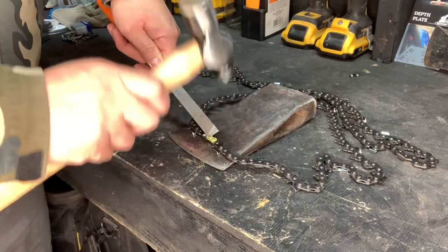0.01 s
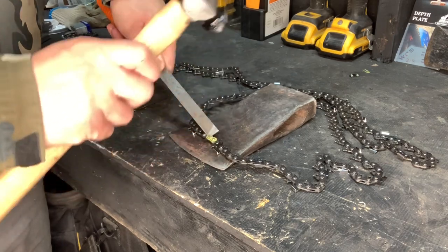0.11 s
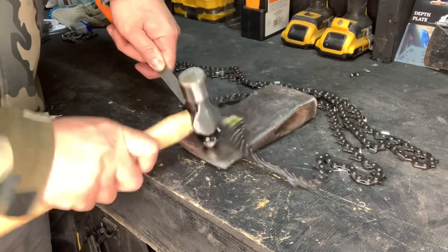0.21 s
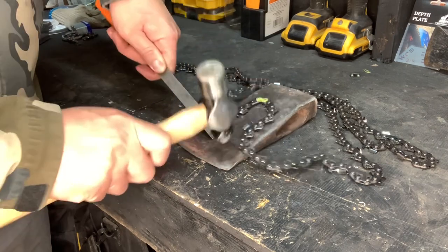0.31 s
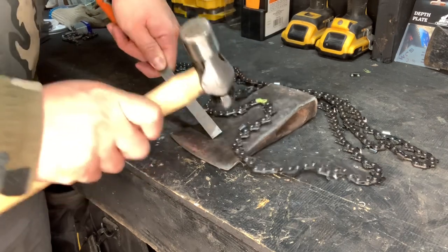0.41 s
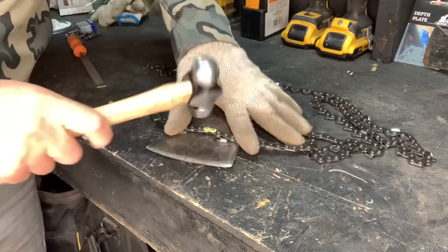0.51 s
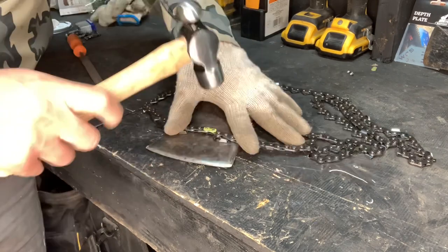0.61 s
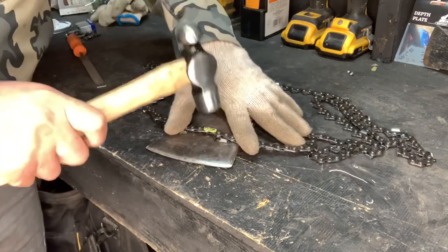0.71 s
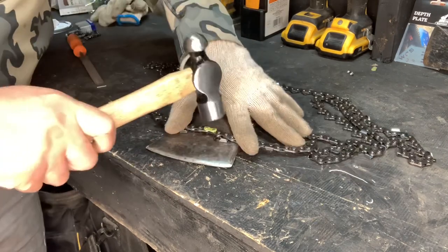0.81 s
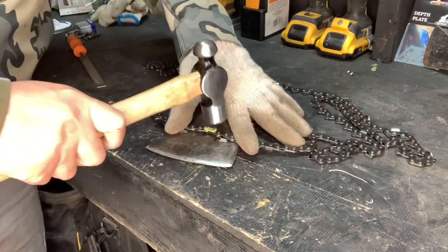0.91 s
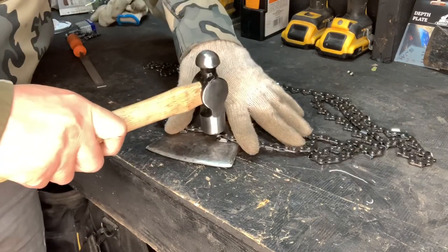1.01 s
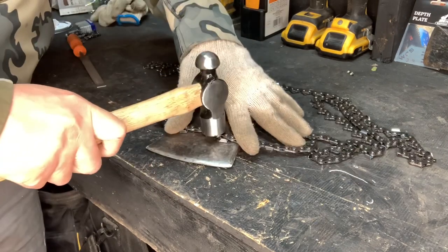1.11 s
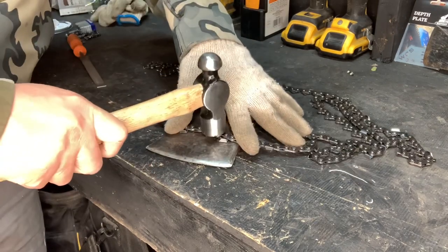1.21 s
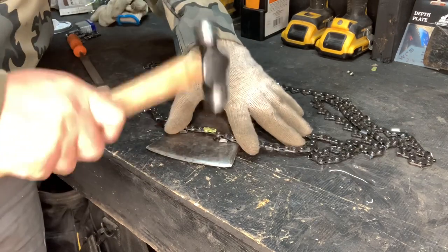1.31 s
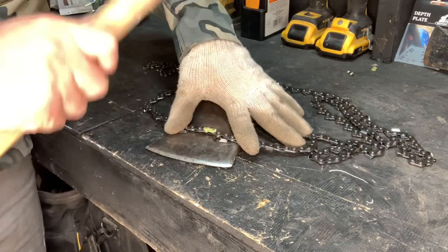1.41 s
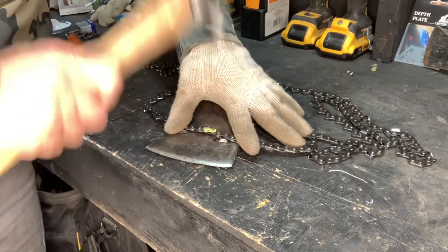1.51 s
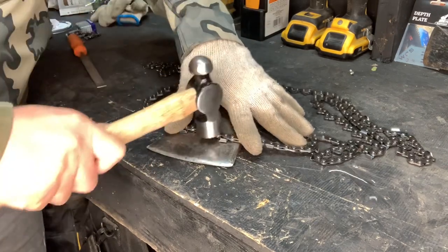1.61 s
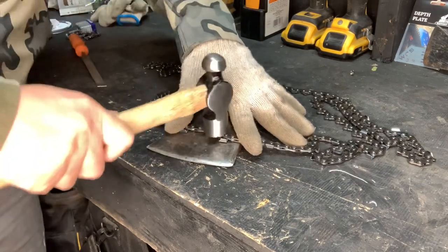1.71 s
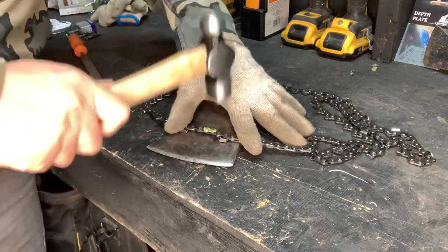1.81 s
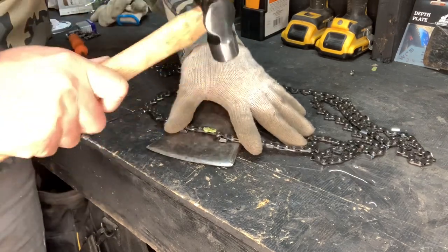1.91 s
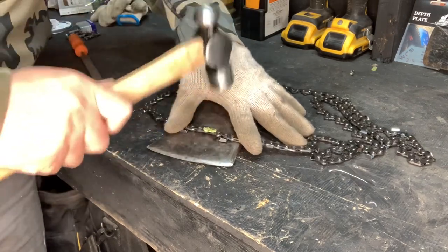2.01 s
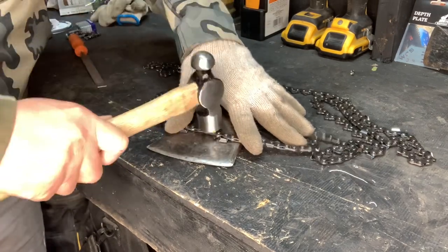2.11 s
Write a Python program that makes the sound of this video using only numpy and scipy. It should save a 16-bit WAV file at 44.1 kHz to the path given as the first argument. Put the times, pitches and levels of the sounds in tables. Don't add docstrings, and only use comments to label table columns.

```python
import sys
import numpy as np
from scipy import signal
from scipy.fft import rfft, irfft, next_fast_len
from scipy.io import wavfile

SR = 44100
rng = np.random.default_rng(int(sys.argv[2]) if len(sys.argv) > 2 else 0)


def gain_from_decibels(decibels):
    exponent = np.asarray(decibels, float) / 20
    return 10 ** exponent


def wav_out(sig):
    wavfile.write(sys.argv[1], SR, np.round(np.clip(np.atleast_2d(sig).T, -1, 1) * 32767).astype(np.int16))


N = 97020
T = np.arange(N) / SR
CHANGE_S = .549

BAR_S = [.2075, .2118, .2147, .2183, .2212, .2277, .2345, .246]
RIVET_S = [1.0058, 1.0075, 1.012, 1.5735, 1.5768, 1.5787, 1.5812, 1.592, 2.1334, 2.135, 2.141]
THUD_S = [.225, .255, .28, .315, 1.008, 1.021, 1.052, 1.101, 1.580, 1.590, 1.612, 1.645, 1.70, 1.77, 2.134,
          2.148, 2.170, 2.188]
LINK_S = [.2173, .2208, .2253, .236, .338, .4607]
CHAIN_S = [1.0035, 1.012, 1.5768, 1.582, 1.615, 2.1322, 2.141]
BLOW_S = [.2135, 1.0055, 1.5765, 2.1335]
LEAD_S = [.007, .004, .034, .009]
HOLD_S = [.014, .004, .006, .004]
BAR_HZ = [1640, 2002, 2222, 2430, 2542, 3382, 3461, 6600, 6880, 7265, 7575]
RING_HZ = [3266, 3312, 3345, 3440, 5019, 6512, 10990, 11680, 12280, 12530, 13130, 13785]
LINK_HZ = [10780, 11700, 12500, 13100, 14150]
BAR_T60 = [.04, .06, .08, .045, .04, .035, .04, .035, .04, .05, .06]
RING_T60 = [.18, .2, .36, .26, .42, .2, .3, .17, .16, .24, .12, .32]
AXE_T60 = [0.092, 0.033, 0.052, .04, 0.027, 0.039, 0.013, 0.026, 0.043, 0.045, .02, 0.0073, 0.016]
SING_DB = [-65, -65.5, -48.5]

BLOWS = list(zip(BLOW_S, LEAD_S, [-17.5, -47.0, -14.5, -31.0], [-6.5, -20, -7.5, -23.5],
         [-19.5, 12, -41.5, -1.5], HOLD_S))
# (frequency [Hz], level [dB])
BLOW_COLOURS = [
    [(50, 0), (130, -20), (300, -3), (800, -10.5), (2400, 1), (6500, -13), (9000, -14), (13000, -24.5),
     (15500, -45.5)],
    [(50, -2), (130, 0.5), (400, -10.5), (900, -5), (2400, -31.5), (6500, -36), (9000, -22), (14000, -56)],
    [(50, -10), (130, -7.5), (280, -9), (900, -10.5), (3000, -4.5), (6500, -22.5), (9000, -15),
     (14000, -33.5)],
    [(50, -20), (130, 1), (400, 0.5), (900, -3.5), (2400, -10), (6500, -41), (9000, -14), (14000, -21.5)],
]
BLOW_TAIL_DB = [-7.5, 5, -1.5, 4.5]
TREBLE_LATE_S = [.004, 0, 0, 0]
# (frequency [Hz], time to fall 60 dB [s])
CRACK_FADE = [(50, 0.42), (300, 0.12), (2000, 0.02), (14000, 0.088)]
TAIL_FADE = [(50, 0.86), (150, 0.55), (400, 0.41), (800, 0.28), (2000, 0.19), (6000, 0.2), (14000, .14)]

BAR_HITS = list(zip(BAR_S, [-36, -18, -8.5, -15.5, -9, -25.5, -27.5, -28]))
BAR_MODES = list(zip(BAR_HZ, [-16, -10, -5.5, -6, -7, 0.5, -3.5, 7.0, -0.5, -6.5, -10.5], BAR_T60))
# (time [s], peak [dB])
RING_HITS = [
    (.2277, -22),
    (.338, -52),
]
RING_MODES = list(zip(RING_HZ, [-7.5, -6.5, -12.5, -8, -15.5, -7, -21.5, -23.5, -30, -19.5, -18.5, -20.5],
              RING_T60))

RIVET_HITS = list(zip(RIVET_S, [-33.0, -40, -84, -13.5, -13, -20.5, -14.0, -24, -20.5, -30.0, -30.0]))
AXE_MODES = list(zip([455, 641, 845, 931, 1420, 2020, 2390, 2676, 3345, 3591, 3914, 4447, 6600],
             [-2.5, -5, 1.5, -9.5, -5.5, -4.5, -1, -11.5, -19, -16, -18.5, -25, -11.5], AXE_T60))
# (time [s], peak [dB])
EDGE_HITS = [
    (1.585, -27.5),
    (1.655, -43.5),
]
# (pitch [Hz], level [dB], time to fall 60 dB [s])
EDGE_MODES = [(3346, 0, 0.2)]

LINK_HITS = list(zip(LINK_S, [-34.5, -22.5, -23.5, -31, -51, -61.5]))
LINK_MODES = list(zip(LINK_HZ, [-1.0, -10, -7.5, -7, -15.5], [.03, 0.019, .02, .02, .02]))
CHAIN_HITS = list(zip(CHAIN_S, [-54, -64, -47.5, -45.5, -41.5, -31, -50]))
CHAIN_MODES = list(zip([6500, 7240, 10780, 11500, 12600, 13790], [-8, -9, -9, -9, -5, -12],
               [.025, .03, .04, .02, .05, .04]))
# (time [s], peak [dB])
TICK_HITS = [
    (1.022, -75),
    (1.054, -71),
    (1.078, -75),
    (1.10, -81),
    (1.127, -76),
    (2.166, -60),
    (2.178, -64),
]
# (pitch [Hz], level [dB], time to fall 60 dB [s])
TICK_MODES = [(6500, 0, .03), (7150, -6, .02), (5300, -12, .01)]

# (time [s], peak [dB])
CLICK_HITS = [
    (1.0042, -43),
    (1.576, -13),
    (2.1322, -33),
]

PLATE_HITS = list(zip(THUD_S, [-25, -35.5, -34, -35, -33.5, -39, -35, -53, -20.5, -6.5, -20.5, -40, -62, -51.5, -25, -22.5, -26.5, -38]))
FRAME_HITS = list(zip(THUD_S, [-27, -53, -46, -40.5, -32, -33, -34, -35.5, -10.0, -12.5, -22.5, -25, -61, -38, -42, -30, -32, -23]))
# (pitch [Hz], level [dB], time to fall 60 dB [s])
PLATE_MODES = [(109, -3, 0.052), (150.2, -3.5, 0.066), (230, -9.5, 0.029), (293.6, -5, 0.05),
               (368.7, -8, 0.036)]
FRAME_MODES = [(49.64, -8.5, 0.063), (95, -4, 0.16)]

SINGS = list(zip([.22, .552, 1.71], [.549, 1.004, 2.126], SING_DB))
# (pitch [Hz], level [dB], time to fall 60 dB [s])
HEAD_MODES = [(2057, 0, 2.2), (5922, -19, 1.6), (4231, -36, 2.0), (6272, -33, 1.5)]

# (frequency [Hz], level [dB])
AIR_BEFORE = [(18, -31), (30, 0.5), (86, -5.5), (434, -13.5), (621, -14.5), (1330, -23.5), (4400, -34.5),
              (9000, -54), (11700, -93), (19800, -120)]
AIR_AFTER = [(18, -31), (30, -5), (245, -5.5), (350, -9), (526, -12.5), (1950, -24), (2100, -31.5),
             (2250, -24.5), (9000, -45), (11700, -98), (19800, -120)]
# (frequency [Hz], likeness [0-1], phase between them [radians])
PORTS = [(60, .9, .3), (400, .7, 1.), (1200, .35, 1.6), (3800, .4, .8), (6000, .4, -2.1),
         (8000, .995, -3.12), (10200, .995, -3.16), (13300, .93, -6.28)]


def at_hz(points, hz, col=1):
    p = np.array(points, float)
    return np.interp(np.log(hz), np.log(p[:, 0]), p[:, col])


def drift(rate):
    r = np.exp(-16 * np.pi * rate / SR)
    noise = rng.standard_normal(N // 8 + 3002)
    slow = signal.lfilter([1], [1, -2 * r, r * r], noise)[3000:]
    return np.interp(np.arange(N) / 8, np.arange(len(slow)), slow / slow.std())


def struck(hits, modes, spread_db):
    s, db = np.transpose(hits)
    out = np.zeros((2, N))
    for hz, level_db, t60 in modes:
        kicks = np.full((2, N), 1e-18)
        draw = rng.standard_normal((len(s), 4))
        strength = gain_from_decibels(db + level_db + spread_db * draw[:, :2].T)
        kicks[:, (s * SR).astype(int)] = strength * np.sign(draw[:, 2:].T)
        r, w = gain_from_decibels(-60 / (t60 * SR)), 2 * np.pi * hz / SR
        waver = gain_from_decibels(2.5 * drift(14))
        out += waver * signal.lfilter([0, np.sin(w)], [1, -2 * r * np.cos(w), r * r], kicks)
    return out


def steel_bar():
    low_pass = signal.butter(4, 10000, fs=SR, output="sos")
    chatter = signal.sosfilt(low_pass, struck(BAR_HITS, BAR_MODES, spread_db=3.0))
    long_rings = struck(RING_HITS, RING_MODES, spread_db=2.5)
    return (gain_from_decibels(-2) * chatter + long_rings) * (T < CHANGE_S)


def bar_ping():
    start_s, rise_s, t60_s = .225, .06, .3
    age = np.maximum(T - start_s, 0)
    shape = (1 - np.exp(-age / rise_s)) * gain_from_decibels(-25 - 60 * age / t60_s)
    tone = np.sin(2 * np.pi * 5019 * age + np.array([[0], [1.2]]))
    return shape * tone * (age < CHANGE_S - start_s)


def axe_head():
    return gain_from_decibels(-5.5) * struck(RIVET_HITS, AXE_MODES, spread_db=-1.0)


def chain_links():
    by_bar = struck(LINK_HITS, LINK_MODES, spread_db=5.0) * (T < CHANGE_S)
    gloved = struck(CHAIN_HITS, CHAIN_MODES, spread_db=6.0)
    return by_bar + gloved + struck(TICK_HITS, TICK_MODES, spread_db=8.0)


def axe_edge():
    return struck(EDGE_HITS, EDGE_MODES, spread_db=1.0)


def steel_clicks():
    s, db = np.transpose(CLICK_HITS)
    spikes = np.full(N, 1e-18)
    spikes[(s * SR).astype(int)] = gain_from_decibels(db)
    return signal.sosfilt(signal.butter(2, 4950, "high", fs=SR, output="sos"), spikes)


def bench():
    plate = struck(PLATE_HITS, PLATE_MODES, spread_db=1.5)
    frame = struck(FRAME_HITS, FRAME_MODES, spread_db=1.5)
    soft = signal.butter(2, [40, 493.8], "band", fs=SR, output="sos")
    return gain_from_decibels(-8) * signal.sosfilt(soft, plate + frame)


def hammer_head():
    out = np.zeros((2, N))
    for start, stop, db in SINGS:
        gate = np.clip(np.minimum((T - start) / .03, (stop - T) / .004), 0, 1)
        for hz, level_db, t60 in HEAD_MODES:
            fade = gain_from_decibels(db + level_db - 60 * (T - start) / t60)
            out += gate * fade * np.sin(2 * np.pi * hz * T + np.array([[0], [2.4]]))
    return out


def blow_power(hz, gains):
    power = 0
    for blow, gain, tail_db, late_s in zip(BLOWS, gains, BLOW_TAIL_DB, TREBLE_LATE_S):
        s, lead_s, db, lead_db, rise_db, hold_s = blow
        age = T - s - .4 / hz - late_s * (hz > 8500)
        old = np.maximum(age - hold_s, 0)
        crack = gain_from_decibels(-60 * old / at_hz(CRACK_FADE, hz))
        tail = gain_from_decibels(-8.0 + tail_db - 60 * old / at_hz(TAIL_FADE, hz))
        far_wall = gain_from_decibels(-34.5 - hz / 1000 - 60 * old / 0.57)
        rise = rise_db * np.clip(age / lead_s, -1, 0)
        lead_in = gain_from_decibels(lead_db - hz / 1000 - rise) * (age > -lead_s)
        shape = np.where(age < 0, lead_in, crack + tail + far_wall)
        same_scene = (T < CHANGE_S) == (s < CHANGE_S)
        power = power + (gain * gain_from_decibels(db) * shape) ** 2 * same_scene
    return power


def air_level(hz, before, after):
    duck_db = -10 * (T > BLOW_S[0]) * (hz > 180)
    level = np.where(T < CHANGE_S, before * gain_from_decibels(-58 + duck_db), after * gain_from_decibels(-68.5))
    return level * gain_from_decibels(2 * drift(1.8))


def rattle_and_air():
    edges = 28 * 2 ** (np.arange(29) / 3)
    mids, widths = np.sqrt(edges[1:] * edges[:-1]), np.diff(edges)
    white = rng.standard_normal((2, 2, N)) * np.sqrt(SR / 2)

    def share(colour):
        g = gain_from_decibels(at_hz(colour, mids))
        return g / np.sqrt(np.sum(g ** 2 * widths))

    blows = np.array([share(c) for c in BLOW_COLOURS])
    before, after = share(AIR_BEFORE), share(AIR_AFTER)
    lumps_per_s = 60
    together, out = drift(lumps_per_s), 0
    for k, hz in enumerate(mids):
        band_pass = signal.butter(2, edges[k:k + 2], "band", fs=SR, output="sos")
        band = signal.sosfilt(band_pass, white[k % 2])
        own = drift(min(lumps_per_s, hz / 8))
        lumps = gain_from_decibels(2.0 * (.5 * together + own))
        air = air_level(hz, before[k], after[k])
        out = out + band * np.sqrt(blow_power(hz, blows[:, k]) * lumps ** 2 + air ** 2)
    return out


def shop_echo(x):
    t = np.arange(SR // 2) / SR
    echo = rng.standard_normal((2, len(t))) * gain_from_decibels(-60 * t / .2) * (t > .003)
    echo = signal.lfilter([1], [1, -.3], echo)
    echo = echo / np.sqrt(np.sum(echo ** 2, axis=1, keepdims=True))
    return x + gain_from_decibels(-8.0) * signal.fftconvolve(x, echo, axes=1)[:, :N]


def ports(x):
    size = next_fast_len(N + 4096)
    left, other = rfft(x, size)
    hz = np.maximum(np.arange(len(left)) * SR / size, 1)
    alike = np.clip(at_hz(PORTS, hz), 0, 1)
    turned = left * np.exp(1j * at_hz(PORTS, hz, col=2))
    right = alike * turned + np.sqrt(1 - alike ** 2) * other
    return irfft(np.array([left, right]), size)[:, :N]


def change_gain():
    fade_out_s, fade_in_s = .035, .025
    gain = np.where(T < CHANGE_S, (CHANGE_S - T) / fade_out_s, (T - CHANGE_S) / fade_in_s)
    return np.clip(gain, .02, 1)


def scene():
    rings = steel_bar() + axe_head() + chain_links() + axe_edge()
    thuds = bench()
    heard = ports(shop_echo(rings) + thuds + rattle_and_air())
    return (heard + hammer_head() + steel_clicks() + bar_ping()) * change_gain()


def top_cut(x):
    return signal.sosfilt(signal.butter(12, 16060, fs=SR, output="sos"), x)


def record(dry):
    dry = signal.sosfilt(signal.butter(3, 36, "high", fs=SR, output="sos"), dry)
    balance = gain_from_decibels(np.array([[-0.06], [0.06]]))
    x = .9 * np.tanh(dry * balance / .9)
    x = signal.sosfilt(signal.cheby2(12, 70, 16250, fs=SR, output="sos"), x)
    return top_cut(x)


dry = scene()
out = record(dry)
wav_out(out)
```